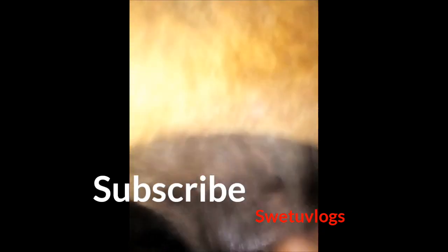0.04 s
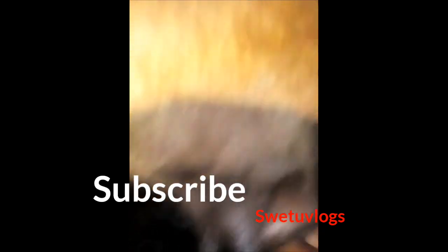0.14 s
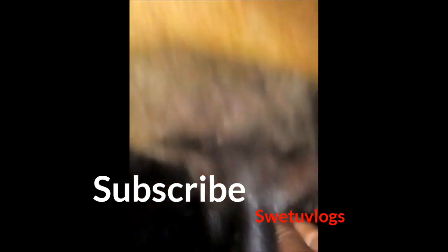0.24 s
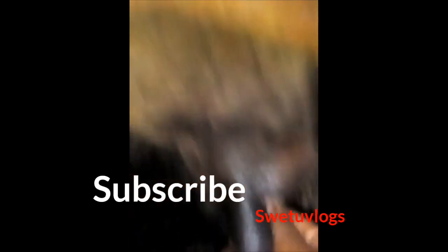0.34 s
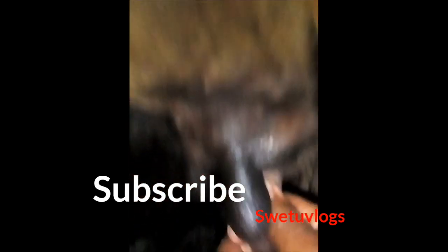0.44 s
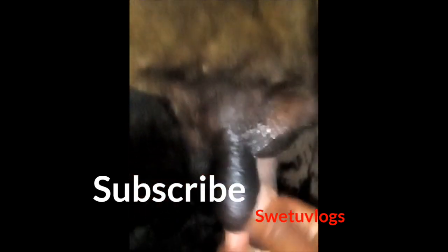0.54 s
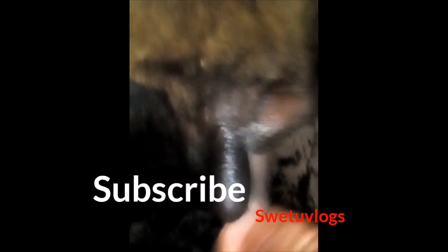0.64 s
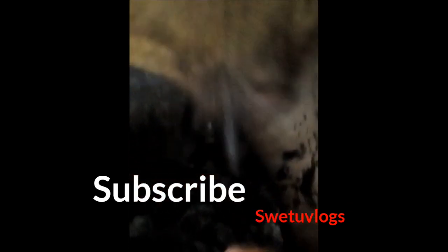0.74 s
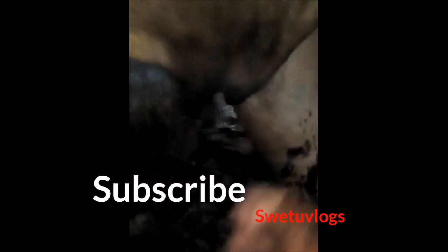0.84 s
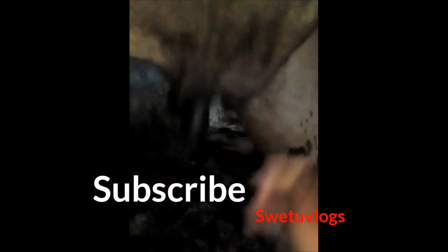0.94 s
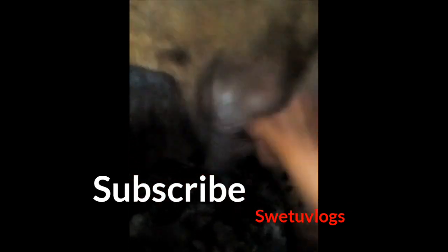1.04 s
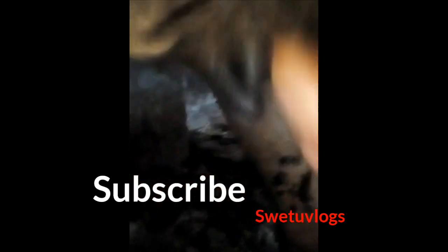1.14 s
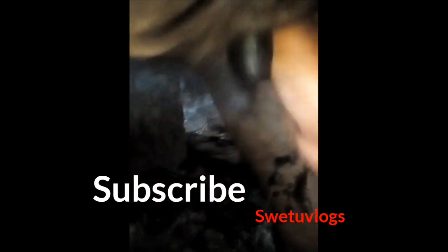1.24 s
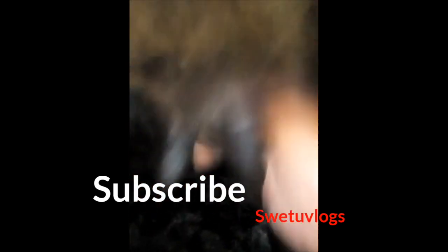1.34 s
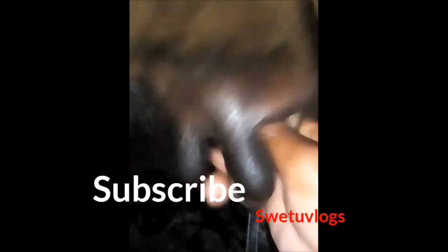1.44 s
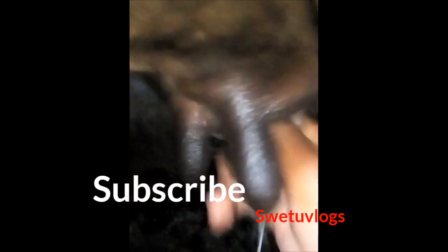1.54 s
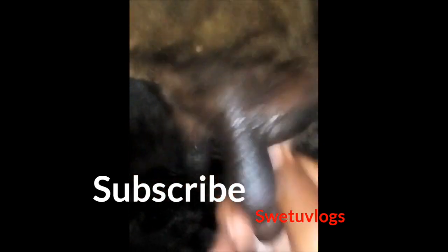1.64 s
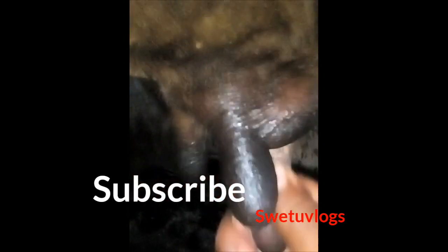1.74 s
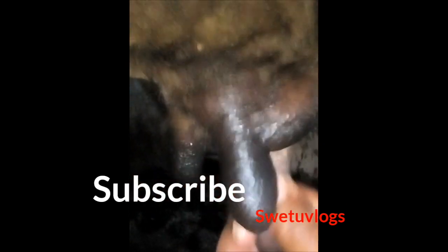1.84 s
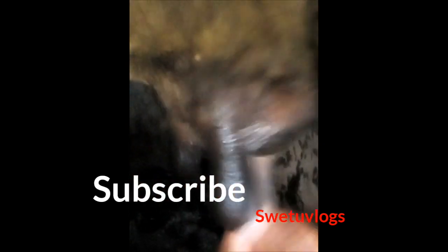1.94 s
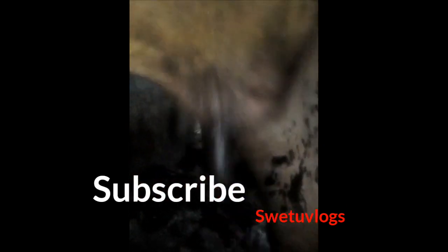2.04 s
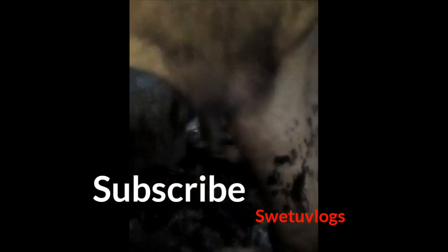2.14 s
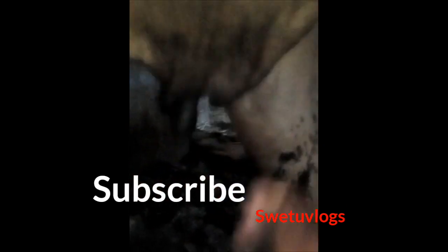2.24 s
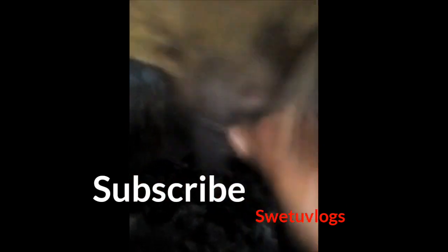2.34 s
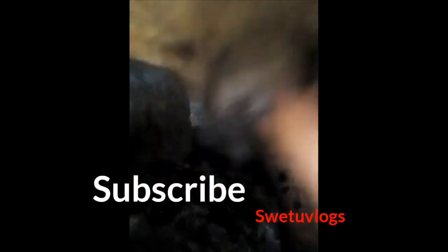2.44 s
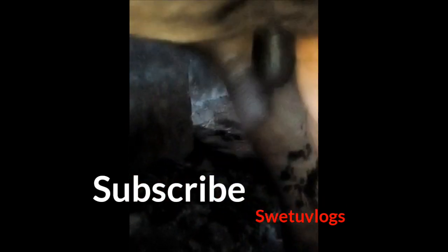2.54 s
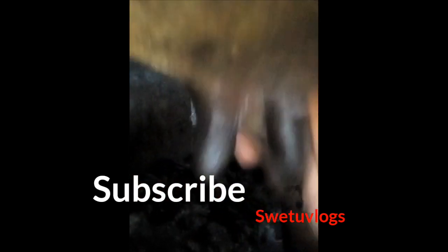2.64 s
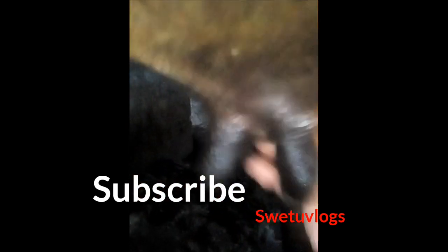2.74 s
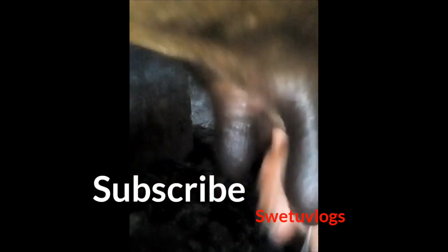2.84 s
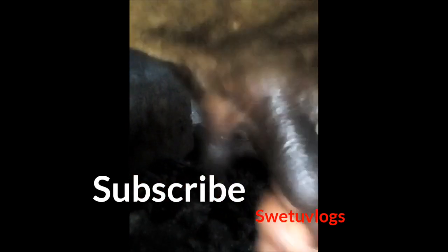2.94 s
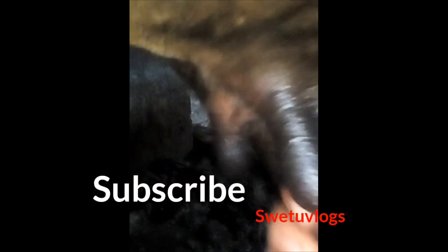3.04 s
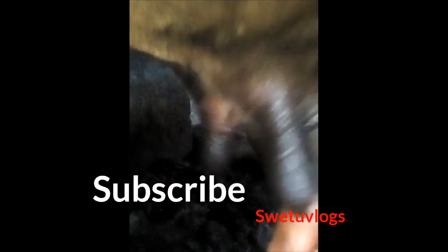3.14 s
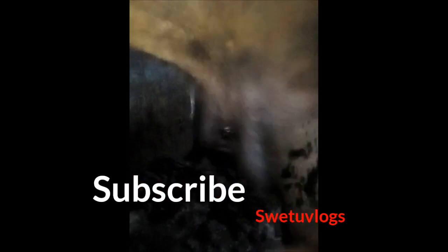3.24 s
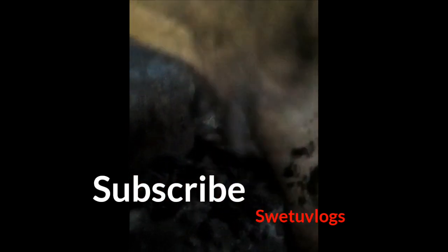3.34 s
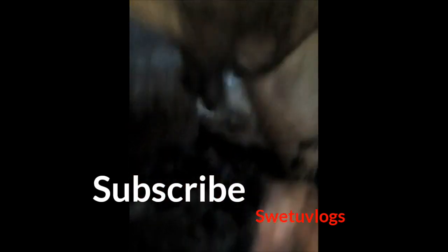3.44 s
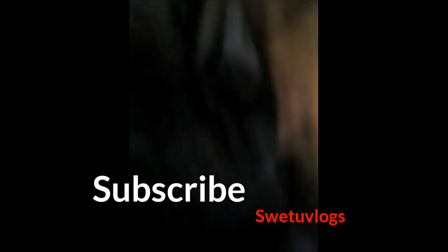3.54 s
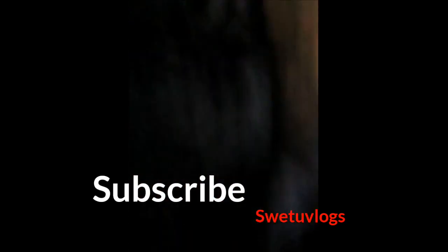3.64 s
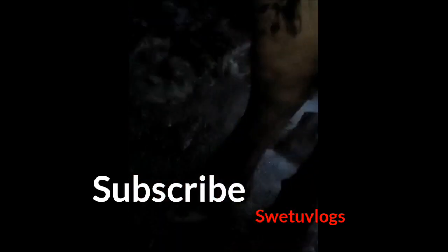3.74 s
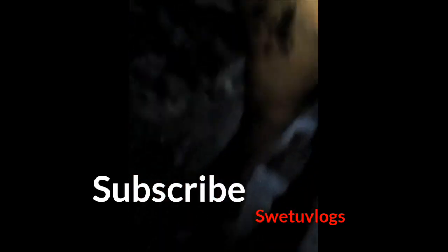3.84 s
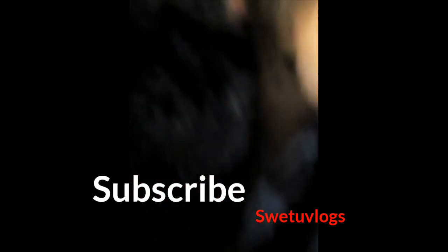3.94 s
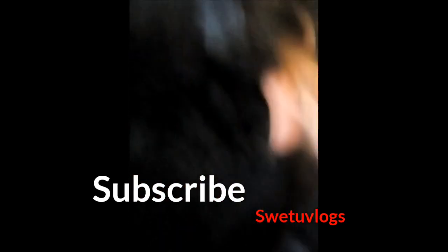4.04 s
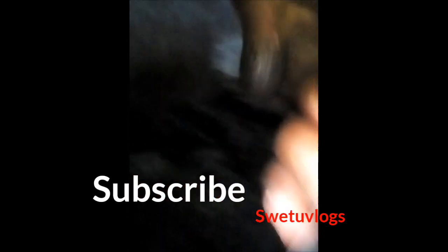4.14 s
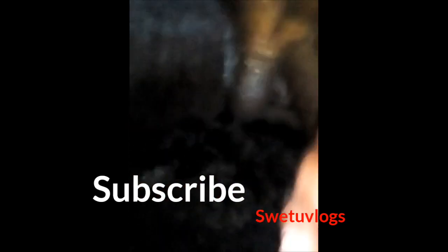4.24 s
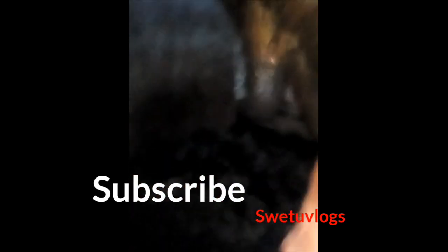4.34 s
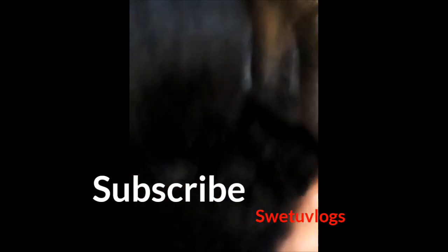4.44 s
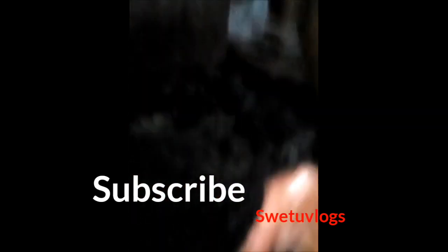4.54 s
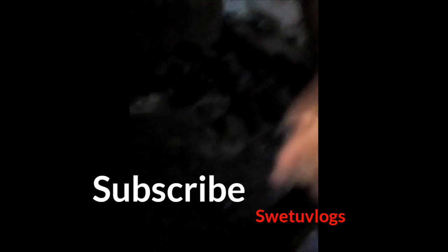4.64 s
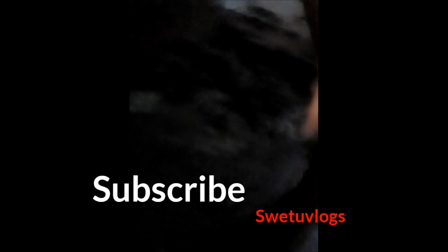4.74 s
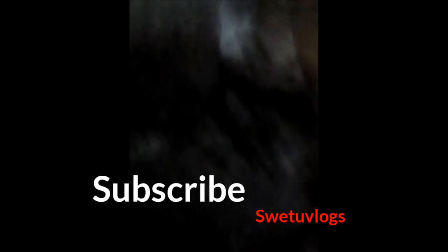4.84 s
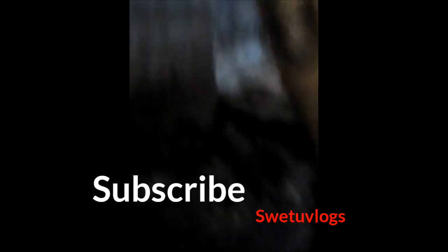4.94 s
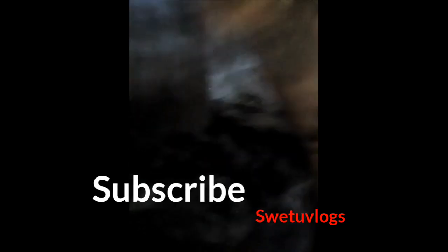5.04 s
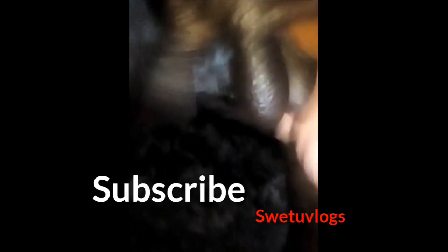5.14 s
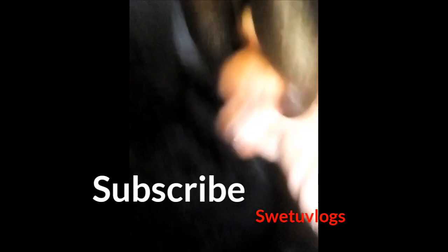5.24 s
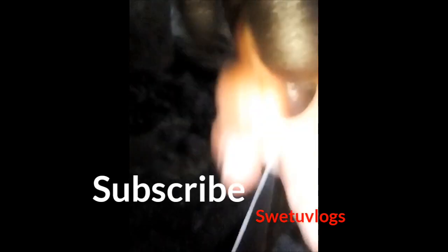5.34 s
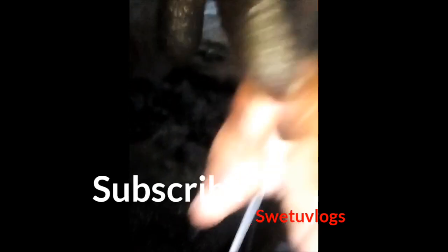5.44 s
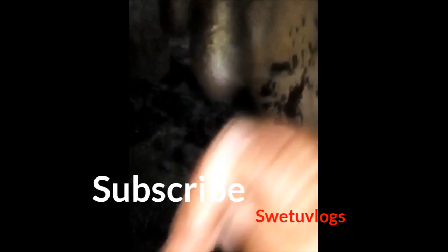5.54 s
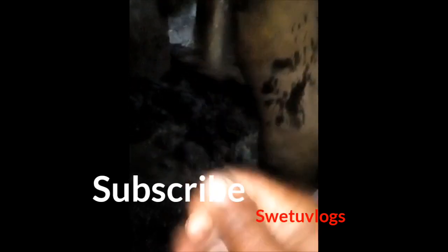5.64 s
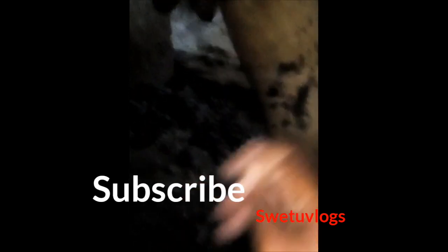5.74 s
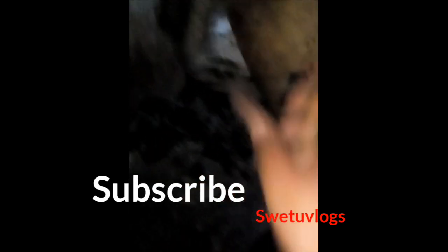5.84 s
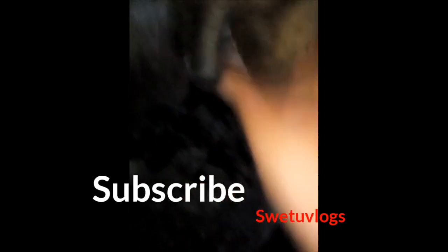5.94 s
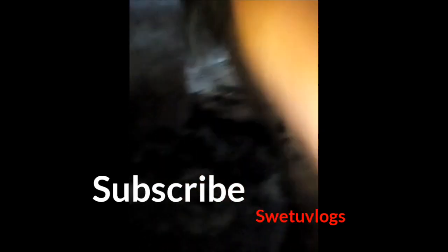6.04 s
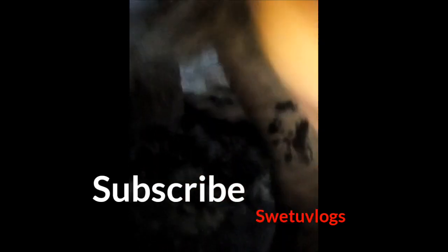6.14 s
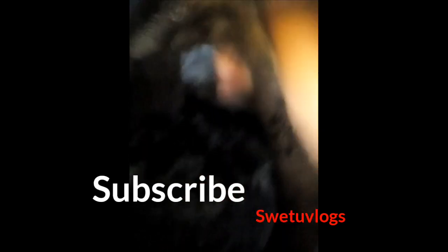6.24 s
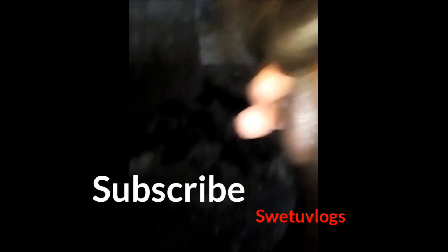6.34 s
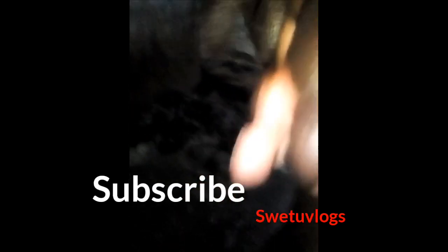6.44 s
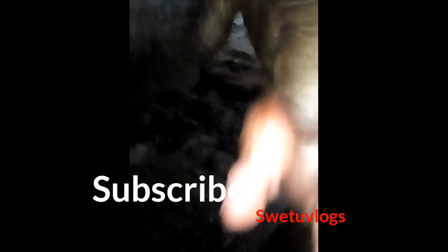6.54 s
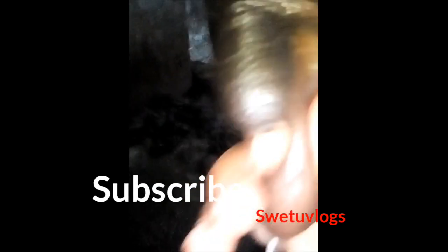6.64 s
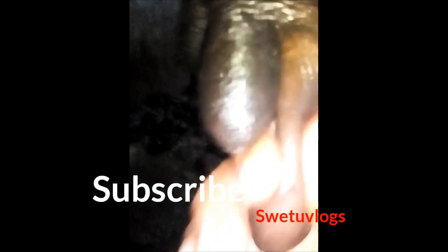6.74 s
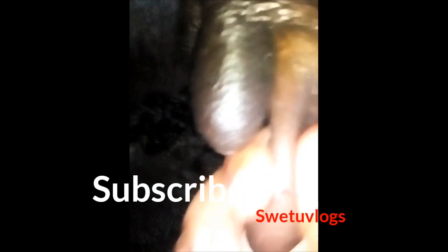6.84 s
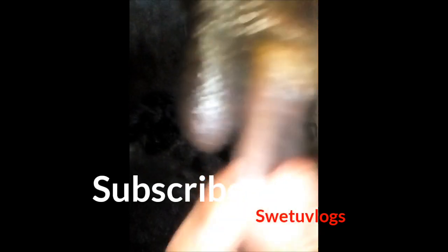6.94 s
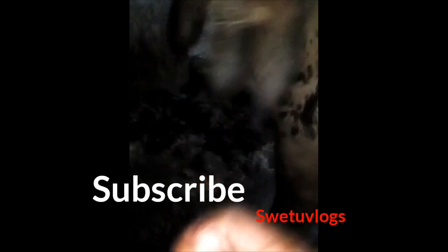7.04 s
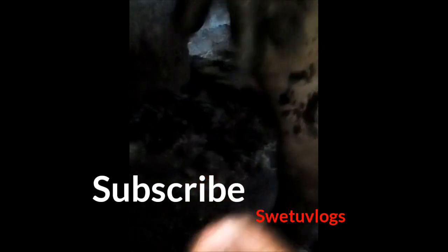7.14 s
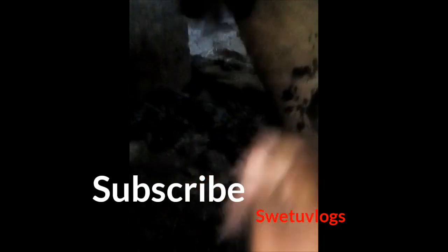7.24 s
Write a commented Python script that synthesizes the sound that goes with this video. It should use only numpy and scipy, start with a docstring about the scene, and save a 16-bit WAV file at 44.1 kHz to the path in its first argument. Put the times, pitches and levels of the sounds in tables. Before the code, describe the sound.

Six short, forceful milk jets squirt rhythmically into a ringing metal pail, while sparrows chirp and far roosters crow over a low farm rumble.

```python
"""Birds whistle and pipe over the low rumble of a farm; then milk is squirted by hand into a metal pail.
Each jet breaks into drops that hiss, ring the pail wall and drive bubbles into the froth: filtered noise
and clicks, resonances and short rising sines, all led by the force of the jet.
Sparrows chirp and far roosters crow as gliding, roughened tones; two dry taps sound close by.
The yard smears the calls with echoes, and the microphone adds its own hiss."""
import sys
import numpy as np
from scipy import signal
from scipy.io import wavfile
from scipy.ndimage import uniform_filter1d

SR = 44100
rng = np.random.default_rng(int(sys.argv[2]) if len(sys.argv) > 2 else 0)


def store_pcm(level_fs):
    """Save levels as 16-bit WAV."""
    pcm = np.round(np.clip(level_fs, -1, 1) * 32767).astype(np.int16)
    wavfile.write(sys.argv[1], SR, np.atleast_2d(pcm).T)


N = 321930  # length of the scene [samples]

# Colour of the low farm rumble: (frequency [Hz], relative level [dB per Hz])
RUMBLE_COLOUR = [(12, -58), (20, -36.5), (53, -41.5), (65, -12), (103, -4.5), (145, -17.5), (201, -2),
                 (236, -10), (304, -15), (700, -43), (910, -53), (1540, -120)]
RUMBLE_DB = -42.5  # rms, before the bass cut
# Colour of the far chatter: (frequency [Hz], relative level [dB per Hz])
CHATTER_COLOUR = [(350, -46), (600, -5.5), (749, -3.5), (1180, -10), (1920, -3.5), (2220, -0.5),
                  (3170, 0.5), (5050, -7.5), (5890, -1.5), (8500, -32), (11000, -64.5), (18700, -120)]
# Swell of the far poultry and birds: (time [s], level [dB])
CHATTER_SWELL = [(0, -57), (.3, -53.5), (.85, -51), (1.3, -52), (2.152, -48), (2.699, -53), (3.5, -54.5),
                 (3.9, -54), (4.601, -54), (5.1, -53.5), (5.801, -55.5), (6.1, -55.5), (6.6, -51.5),
                 (7.3, -46.5)]
# How long the yard's echoes last: (frequency [Hz], time to fall by 60 dB [s])
YARD_DECAY = [(500, 0.61), (2000, 0.24), (5000, 0.32), (9000, 0.066)]
# Syllables of crowing: (start [s], length [s], pitch at the start, at the turn and at the end [Hz],
# share of the length before the turn [0-1], fade by the end [dB], roughness [0-1],
# relative levels of overtones 1 to 4 [dB])
CROW_SYLLABLES = [(.92, 0.28, 688, 728, 738, 0.27, -10, 0.19, -59.5, -84, -57.5, -64),
                  (1.22, .17, 771, 803, 789, 0.61, 1.5, 0.092, -57.5, -62, -64, -60),
                  (1.41, .27, 869, 884, 920, 0.21, 3, 0.35, -68, -55.5, -57, -83),
                  (2.1, 0.19, 789, 811, 820, 0.19, 12.5, 0.2, -59.5, -64, -62, -76),
                  (2.4, .56, 740.6, 691.4, 600, 0.65, -18.5, 0.087, -51, -59, -57, -79),
                  (5.1, 0.18, 827, 804, 728, 0.26, -1, .4, -62, -59.5, -66, -66),
                  (5.31, 0.19, 760, 730, 751, 0.27, -2, 0.16, -58, -73, -80, -82),
                  (5.62, 0.26, 703, 732.3, 732, 0.235, -13.5, 0.31, -54.5, -40, -58, -78),
                  (5.87, .59, 770, 801, 747, .72, -1.5, 0.26, -52, -47, -67, -56),
                  (6.52, 0.21, 746, 774, 760, 0.23, -5, 0.061, -49.5, -50.5, -76, -65),
                  (7.06, 0.16, 727, 731.6, 706.7, 0.31, 4, 0.061, -48, -45, -62, -57)]
# One sparrow chirp, a list of notes: (time from its start [s], pitch before the factor [Hz], relative level [dB])
CHIRP_NOTES = [
    [(0, 5870, -29), (.005, 5950, -11.5), (.012, 5110, -15), (.022, 5600, -8)],
    [(.016, 2780, -24.5), (.027, 4257, -4), (.034, 5007, -0.5), (.05, 3690, -9.5), (.062, 4170, 7)],
    [(.062, 2700, -45), (.075, 3192, -4.5), (.085, 3660, -3.5), (.11, 3187, -23), (.14, 2870, -18)],
]
# When the chirp is repeated: (time [s], relative level [dB], pitch factor [ratio])
CHIRP_TIMES = [(1.011, -25, 0.96), (1.637, -23, 0.95), (2.653, -44, 0.92), (3.506, -22.5, 0.98),
               (3.758, -40.5, 0.85), (4.691, -27.5, 0.94), (5.135, -46, 0.82), (5.772, -46.5, 0.94),
               (6.412, -26.5, 0.95), (7.191, -26.5, 0.93)]
# A rising whistle with a turn: (time from its start [s], pitch before the factor [Hz], relative level [dB])
WHISTLE_NOTES = [
    [(0, 3070, -12), (.024, 4330, -11), (.04, 5710, -7), (.058, 5760, 8)],
    [(.056, 5440, -5), (.08, 3920, -6.5)],
    [(.085, 5450, -12.5), (.108, 6020, 3)],
    [(.105, 4200, -63), (.122, 4880, -1), (.14, 5010, -5.5)],
]
# When the whistle is repeated: (time [s], relative level [dB], pitch factor [ratio])
WHISTLE_TIMES = [(0.029, -25.5, 0.97), (2.824, -28, 1), (5.555, -32, 0.96)]
# Mellow notes of other birds, and one high partial of a crow (at 6.508 s):
# (start [s], length [s], first pitch [Hz], last pitch [Hz], relative level [dB])
MELLOW_NOTES = [(0, 0.053, 2573, 2710, -25), (0, 0.11, 2327, 2547, -34), (.07, 0.036, 2780, 2750, -28),
                (0.269, 0.042, 2173, 2065, -32.5), (.305, .027, 2010, 1750, -33),
                (.333, 0.019, 1857, 1840, -40.5), (0.898, 0.16, 4030, 4460, -51),
                (1.229, 0.086, 3460, 3710, -45.5), (1.402, 0.063, 3410, 3220, -49.5),
                (2.349, .05, 2416, 2270, -39), (2.423, 0.12, 3720, 3680, -55),
                (2.714, 0.16, 2575, 2396, -47.5), (2.846, 0.14, 2734, 2490, -40),
                (2.849, 0.083, 2396, 2226, -29.5), (2.937, 0.056, 2183, 2190, -30.5),
                (3.328, 0.035, 1625, 1660, -31), (3.402, 0.022, 2230, 2230, -23.5),
                (3.862, 0.16, 3090, 2900, -53.5), (4.02, .16, 3729, 3714, -58.5),
                (4.158, 0.048, 3270, 3260, -51.5), (4.754, 0.31, 1800, 1645, -62),
                (4.893, 0.05, 4000, 3750, -47.5), (5.22, 0.048, 2235, 2156, -48),
                (6.281, 0.16, 4700, 4260, -58), (6.508, 0.15, 1920, 1927, -53),
                (6.603, 0.046, 3920, 4190, -51), (6.652, 0.071, 4140, 4060, -54),
                (7.075, 0.066, 2110, 2306, -31.5)]
# Dry taps close by: (time [s], peak of the tick [dB], thud over the tick [dB])
KNOCK_TIMES = [(1.174, -29.5, 14), (3.639, -16.5, 10)]
# Large single drops on the pail: (time [s], peak level [dB], pitch [Hz])
LARGE_DROPS = [(0.414, -29, 1740), (0.581, -11.5, 1930), (0.618, -1, 1370), (0.636, -2, 1110),
               (0.721, -28.5, 4900), (1.79, -5.5, 2500), (1.964, -5, 1450), (2.003, -6.5, 1360),
               (2.038, -12, 1430), (3.018, -25, 2160), (3.098, -29, 1340), (3.293, -20.5, 4570),
               (4.275, -30, 1030), (4.3673, -7, 5800), (4.375, -14, 2640), (4.384, -6, 1790),
               (4.441, -7, 1440), (5.48, -24, 1000), (5.59, -15, 1360), (6.73, -21, 1800),
               (6.875, -6, 2520), (6.902, -3.5, 1450), (6.92, -9, 1500), (6.94, -3.5, 1400),
               (6.956, -11, 3200), (6.993, -1.5, 1930), (7.006, -11, 1260), (7.022, -19, 1330),
               (7.109, -19, 2250)]
# Colour of the drops' hiss: (frequency [Hz], relative level [dB per Hz])
HISS_COLOUR = [(1650, -36.5), (2800, 4), (3130, -8), (3400, 1), (3680, 5), (5370, -2.5), (6640, 3),
               (8500, -28), (11000, -64), (18700, -120)]
# Colour of the finest droplets: (frequency [Hz], relative level [dB per Hz])
SPRAY_COLOUR = [(4410, -54.5), (7500, 4.5), (8610, -9.5), (9800, -7.5), (11400, -16), (13500, -18),
                (15100, -7), (15900, -44)]
# Ways the pail wall can ring: (frequency [Hz], width [Hz], relative level [dB])
PAIL_MODES = [(235.5, 24, 3.5), (395, 45, -1), (500.8, 23.3, -5), (573, 35, -2.5), (792.6, 58, -1.5),
              (1023, 35, -0.5), (1169, 40, -3.5), (1307, 48, -6.5), (1426, 48, -3.5), (1570, 170, -21),
              (1749.5, 23.6, 8.5), (1910, 64, 4.5), (2178, 71, 0), (2216, 53, -0.5), (2322, 92, -4.5),
              (2453, 173, 0), (2604, 57, 3), (2703, 40, -7), (2920, 280, 2.5), (3166, 90, 5),
              (3650, 85, -18), (4360, 84, -13.5), (5016, 140, -0.5), (5760, 140, -7), (6700, 43, -8.5)]
# One entry a squirt, in two parts. Tones: (pitch of the struck spot's ring [Hz], of the bubbles [Hz],
# of the boom [Hz], boom over the force [dB], spray [dB]).
# Pull of the hand: (time [s], jet force [dB], wall ring over the force [dB], froth over the force [dB])
SQUIRT_PULLS = [ ((2700, 1295, 496, -6.5, -41), [(.408, -27, -25.5, -13), (.43, -27, 10, 7),
                (.474, -19, 6.5, -4), (.495, -29, 3.5, -1.5), (.567, -17.5, 4.5, -7.5),
                (.619, -20, -4, 8.5), (.677, -22.5, 1.5, -3), (.719, -38, -1.5, 3), (.785, -57, 6.5, -10),
                (.9, -59.5, 17.5, -1)]), ((2606, 1317, 361.5, -7, -40.5), [(1.69, -29.5, -10, -5),
                (1.712, -32.5, 1, 4.5), (1.717, -20.5, 8, -11), (1.74, -24, 14, 1), (1.788, -17, 3, -9),
                (1.802, -21, -2, -1.5), (1.914, -19.5, -1, 5), (2.026, -23, 5.5, 2.5), (2.04, -36, 5.5, 10),
                (2.14, -57, 0, -15)]), ((1902, 1150, 596, 2, -64), [(2.212, -32, -6, 5), (2.22, -29, 0, 0),
                (2.268, -35, -1, -4), (2.326, -53.5, 3, 4), (2.36, -44.5, 3, 6), (2.47, -55.5, 2.5, -9)]),
                ((2396, 1325, 471, -5, -38), [(3.016, -21, -17, -12), (3.022, -24.5, -12, -8),
                (3.027, -20.5, -12, -4.5), (3.033, -34.5, -4, 7), (3.038, -22, 13, -1),
                (3.095, -19.5, 7, 1.5), (3.149, -19, 2, 9), (3.255, -21.5, 3.5, 2), (3.305, -45, 4, -10),
                (3.36, -50.5, 14, 3)]), ((2604.5, 1110, 414, -14.5, -36), [(4.271, -32, -22, -12),
                (4.286, -30.5, -20, -4), (4.292, -31, 17, 12.5), (4.305, -28, 9, 2.5),
                (4.354, -23, 3, -1.5), (4.422, -19, -8, 10.5), (4.48, -42, -5, -17), (4.55, -55, 5, -3)]),
                ((2796, 1294, 275, 1.5, -36), [(5.476, -29.5, -19, -8), (5.49, -26.5, -3.5, 6),
                (5.525, -28.5, 12, 14.5), (5.553, -25, 13.5, 4.5), (5.572, -31.5, 10.5, 9),
                (5.596, -35, 6.5, 2), (5.66, -55, 4, 15)]), ((2782, 1330, 439, -1.5, -37),
                [(6.718, -36, -14, -21), (6.728, -28, -8, -6), (6.766, -35, 2, 15), (6.774, -19.5, 1.5, -2),
                (6.828, -24, 5.5, 9), (6.872, -26, 5.5, 7.5), (6.936, -26.5, 6, 16), (6.988, -23, 7, 6),
                (7.04, -26.5, 4.5, 10), (7.16, -63.5, 16, 13)]), ((3200, 901, 424, 13.5, -75),
                [(7.24, -52, -16, -20), (7.264, -44.5, -4, 9), (7.3, -45, 0, 6)]), ]
# Colour of the microphone's own hiss: (frequency [Hz], relative level [dB per Hz])
MIC_COLOUR = [(4710, -33.5), (8000, -8.5), (10500, -4), (11800, -5.5), (13600, -8), (15000, -3),
              (15900, -1.5)]
MIC_DB = -76.5

SPOT_SAG = 0.17  # the ring falls by this share as the jet slides down the wall
BOOM_PER_RING = -0.84  # the pail booms less while the jet is on the wall (dB per dB)
BOOM_START_DB, BOOM_RISE_S = -9, 0.11  # the boom builds up as the jet digs into the milk
SPRAY_KNEE_DB, SPRAY_PER_FORCE = -28, 1.7  # steady above this force, dies fast under it (dB per dB)
MELLOW_ATTACK_S, MELLOW_START_DB, MELLOW_FADE_DB = .012, 0.5, -4.5
CROW_ATTACK, CROW_START_DB = 0.13, -3  # share of the syllable; level under the top
CROW_WAVER_DB, CROW_WAVER_S = 2.5, 0.045  # at full roughness; hoarse syllables waver more
LOW_CUT_HZ, EDGE_HZ = 65, 15800  # the microphone loses the deepest bass; upper band limit
OVERLOAD_TOP = .85  # level that soft overload never passes


def gain_of(db):
    """Turns decibels into a factor."""
    return 10 ** (np.asarray(db) / 20)


def evened(x):
    """Scales a sound to rms 1."""
    return x / np.sqrt(np.mean(x ** 2) + 1e-20)


def read(points, hz):
    """Looks up (frequency, value) points on a log frequency axis."""
    f, value = np.transpose(points)
    return np.interp(np.log(hz + 1), np.log(f + 1), value)


def add(mix, s, sound):
    """Lays a sound into the mix at s seconds."""
    part = mix[max(round(s * SR), 0):][:len(sound)]
    part += sound[:len(part)]


def columns(rows):
    """Joins curve rows by straight lines, one value a sample; also gives the start time."""
    s, *values = np.transpose(rows)
    t = np.arange(s[0], s[-1], 1 / SR)
    return s[0], [np.interp(t, s, v) for v in values]


def wander(n, seconds):
    """Random drift of rms 1: noise averaged twice over the given time."""
    width = max(int(seconds * SR), 2)
    once = uniform_filter1d(rng.standard_normal(n), width)
    return evened(uniform_filter1d(once, width))


def coloured(x, points):
    """Gives a sound the colour of the points, with a filter that never acts ahead of time."""
    level_db = read(points, abs(np.fft.fftfreq(4096, 1 / SR)))
    log_gain = np.log(gain_of(np.maximum(level_db, -90)))
    taps = np.fft.ifft(np.exp(np.conj(signal.hilbert(log_gain)))).real[:2048]
    return signal.oaconvolve(x, taps / np.linalg.norm(taps))[:len(x)]


def ring(x, hz, width):
    """A fixed resonance applied twice for steep flanks; white noise keeps about its level."""
    r = np.exp(-1.5 * np.pi * width / SR)
    turn = np.exp(2j * np.pi * hz / SR)
    level = 2 * np.sqrt(2) * (1 - r) ** 1.5
    return level * signal.lfilter([1], np.poly([r * turn] * 2), x + 0j).real


def echoes(x, decays, gap_s):
    """Sparse echoes of random sign after a gap, each band dying at its own speed."""
    taps = np.zeros(SR)
    at = np.arange(int(gap_s * SR), SR - 20, 20)
    taps[at + rng.integers(0, 20, len(at))] = rng.choice([-1., 1.], len(at))
    hz, t, z = signal.stft(taps, SR, nperseg=256)
    fade = gain_of(-60 * t / read(decays, hz)[:, None])
    tail = signal.istft(z * fade, SR, nperseg=256)[1]
    return signal.fftconvolve(x, tail / np.linalg.norm(tail))[:N]


def patchy(points, patch_db, streak_db):
    """Coloured noise from random short spectra, its level drifting in wide patches and long narrow streaks."""
    frames, hz = N // 256 + 5, np.fft.rfftfreq(1024, 1 / SR)
    a, b, patches, streaks = rng.standard_normal((frames, 513, 4)).T
    # axis 0 runs over frequency, axis 1 over time
    patches = evened(uniform_filter1d(uniform_filter1d(patches, size=14, axis=0), size=24, axis=1))
    streaks = evened(uniform_filter1d(uniform_filter1d(streaks, size=3, axis=0), size=30, axis=1))
    depth = np.clip(2500 / (hz[:, None] + 1), .8, 1.7)  # the treble is the steadier part
    level_db = read(points, hz)[:, None] + depth * (patch_db * patches + streak_db * streaks)
    z = (a + 1j * b) * gain_of(level_db)
    return evened(signal.istft(z, nperseg=1024, noverlap=768)[1][:N])


def farm():
    """Low rumble at a steady level and a swelling far chatter, both patchy noise."""
    s, db = np.transpose(CHATTER_SWELL)
    swell = gain_of(np.interp(np.arange(N) / SR, s, db))
    chatter = swell * patchy(CHATTER_COLOUR, patch_db=1.5, streak_db=2.6)
    rumble = gain_of(RUMBLE_DB) * patchy(RUMBLE_COLOUR, patch_db=0.58, streak_db=1.1)
    return rumble + chatter


def hoarse(n, rough, seconds):
    """Fast random changes in size and phase that spread a pure tone into a band."""
    chance = wander(n, seconds) + 1j * wander(n, seconds)
    return (1 + rough * chance) / np.sqrt(1 + 2 * rough ** 2)


def roosters():
    """Each syllable stacks four overtones that swell and fade, each wavering by itself."""
    out = np.zeros(N)
    for start, length, first_hz, turn_hz, last_hz, share, fade_db, rough, *levels_db in CROW_SYLLABLES:
        done = np.arange(0, length, 1 / SR) / length
        n = len(done)
        hz = np.interp(done, [0, share, 1], [first_hz, turn_hz, last_hz])
        swell_db = np.interp(done, [0, CROW_ATTACK, 1], [CROW_START_DB, 0, fade_db])
        shaky_hz = hz * (1 + 0.02 * rough * wander(n, 0.0049))
        turn = np.exp(2j * np.pi * np.cumsum(shaky_hz) / SR)
        stack = np.zeros(n, complex)
        for k, db in enumerate(levels_db, start=1):
            waver_db = CROW_WAVER_DB * np.sqrt(rough) * wander(n, CROW_WAVER_S)
            stack += gain_of(db + waver_db) * turn ** k * hoarse(n, 2 * rough / k, 0.0019)
        soft_ends = signal.windows.tukey(n, .15)
        add(out, start, np.sqrt(2) * gain_of(swell_db) * stack.real * soft_ends)
    return out


def note(rows, db=0, factor=1, rough=0, overtone_db=-30):
    """A near sine on a pitch curve, with soft ends and a weak overtone an octave up."""
    s, (hz, level_db) = columns(rows)
    n = len(hz)
    turn = np.exp(2j * np.pi * np.cumsum(hz * factor) / SR)
    pure = turn + gain_of(overtone_db) * turn ** 2
    tone = (pure * hoarse(n, rough, 0.0013)).real
    soft_ends = signal.windows.tukey(n, min(350 / n, 1))
    return s, np.sqrt(2) * gain_of(db + level_db) * tone * soft_ends


def mellow_note(start, length, first_hz, last_hz, db):
    """A mellow tone: the pitch holds for a moment, then glides while the level fades."""
    rows = [(start, first_hz, MELLOW_START_DB),
            (start + MELLOW_ATTACK_S, first_hz, 0),
            (start + length, last_hz, MELLOW_FADE_DB)]
    return note(rows, db, rough=0.18, overtone_db=-31.5)


def birds():
    """Sparrows repeat one harsh chirp, a whistler one phrase; mellow notes vary, one a high partial of a crow."""
    out = np.zeros(N)
    for start, db, factor in CHIRP_TIMES:
        for rows in CHIRP_NOTES:
            varied_db = db + 2.0 * rng.standard_normal()
            s, sound = note(rows, varied_db, factor, rough=.55, overtone_db=-35)
            add(out, start + s, sound)
    for start, db, factor in WHISTLE_TIMES:
        for rows in WHISTLE_NOTES:
            s, sound = note(rows, db, factor, rough=.3, overtone_db=-24)
            add(out, start + s, sound)
    for row in MELLOW_NOTES:
        add(out, *mellow_note(*row))
    return out


def knock(db, thud_db):
    """A dry tap: a broad tick of ringing noise with a very short dull push under it."""
    t = np.arange(1500) / SR
    blow = rng.standard_normal(len(t)) * np.exp(-t / 0.0022)
    tick = ring(ring(blow, 3000, 2100) + .5 * ring(blow, 5500, 1200), 2400, 3900)
    thud = np.sin(2 * np.pi * 220 * t) * np.exp(-t / 0.0005)
    return gain_of(db) * (tick / abs(tick).max() + gain_of(thud_db) * thud)


def clicks(n, per_s, spread_db):
    """Random impacts of drops, most small, a few large."""
    size = gain_of(spread_db * np.minimum(rng.exponential(1, n), 4)) * rng.choice([-1., 1.], n)
    return size * (rng.random(n) < per_s / SR)


def wall(blows, zones):
    """Pail modes set ringing; in each zone (top [Hz], level [dB], pitch [Hz]) those near the pitch are favoured."""
    out = np.zeros(len(blows))
    for hz, width, db in PAIL_MODES:
        zone_db, spot_hz = next((level, spot) for top, level, spot in zones if hz < top)
        favour_db = 14 * np.exp(-(np.log(hz / spot_hz) / 0.12) ** 2)
        strays_db = 4.5 * wander(len(blows), .022)  # the jet strays, so each mode comes and goes
        out += ring(blows * gain_of(db + zone_db + favour_db + strays_db), hz, width)
    return out


def bubbles(hz, per_s=260, cycles=7, rise=0.49):
    """Air dragged under the froth: short sines that rise as they die."""
    out = np.zeros(len(hz))
    draws = rng.random((int(per_s * len(hz) / SR) + 1, 4))
    for place, shift, size, phase in draws:
        f = hz[int(place * len(hz))] * np.exp(0.42 * (shift - .5))
        turns = np.arange(0, 4 * cycles, f / SR)
        shape = (1 - np.exp(-turns / 1.15)) * np.exp(-turns / cycles * 3.24)
        rising = turns * (1 + rise * turns / 30)
        tone = np.sin(2 * np.pi * (rising + phase))
        add(out, place * len(hz) / SR, gain_of(5.3 * size) * shape * tone)
    return evened(out)


def drop(db, hz):
    """One large drop: a short crack of noise and the wall modes near its pitch."""
    blow = rng.standard_normal(4000) * np.exp(-np.arange(4000) / SR / 0.0017)
    sound = gain_of(1.5) * coloured(blow, HISS_COLOUR)
    sound += gain_of(-13.5) * coloured(blow, SPRAY_COLOUR)
    sound += 3 * ring(blow, hz, 0.22 * hz)
    sound += wall(blow, [(700, -20, 500), (SR, -15, hz)])
    return gain_of(db) * sound / abs(sound).max()


def squirt(tones, rows):
    """The broken jet hisses, rings the wall and makes bubbles, all by its force."""
    spot_hz, bubble_hz, boom_hz, boom_db, spray_db = tones
    s, values = columns(rows)
    pull_length = len(values[0])
    values.append(np.linspace(0, 1, pull_length))
    # extra samples let the wall ring out after the pull
    force_db, ring_db, froth_db, done = np.pad(values, ((0, 0), (0, 3000)), "edge")
    n = len(force_db)
    sagging_hz = spot_hz * (1 - SPOT_SAG * done)
    boom_build_db = BOOM_START_DB * np.exp(-np.arange(n) / SR / BOOM_RISE_S)
    boom_db = boom_db + BOOM_PER_RING * ring_db + boom_build_db
    # taking the force out here keeps the spray steady above the knee
    spray_db = spray_db - force_db + SPRAY_PER_FORCE * np.minimum(force_db - SPRAY_KNEE_DB, 0)

    sputter_db = 1.84 * wander(n, 0.002) + 0.36 * wander(n, 0.0012)
    force = gain_of(force_db + sputter_db) * (np.arange(n) < pull_length)
    blows = force * evened(evened(clicks(n, 900, 3.26)) + 0.89 * rng.standard_normal(n))
    mist = force * evened(0.68 * evened(clicks(n, 2700, 4.0)) + rng.standard_normal(n))

    froth = gain_of(froth_db - 9.5) * force * bubbles(np.full(n, bubble_hz))
    small_bubbles = gain_of(ring_db - 6) * force * bubbles(sagging_hz, per_s=450, cycles=4.5)
    hiss = gain_of(-2.0) * coloured(blows, HISS_COLOUR)
    spray = coloured(gain_of(spray_db) * mist, SPRAY_COLOUR)
    zones = [(700, boom_db - 14.5, boom_hz),
             (1700, froth_db - 16.5, bubble_hz),
             (3400, ring_db - 23.5, sagging_hz),
             (SR, -14, 4300)]
    return s, hiss + spray + froth + small_bubbles + wall(blows, zones)


def scene():
    """Mixes milk and taps, near and almost dry, with far wet calls and the farm; the birds are dulled."""
    milk = np.zeros(N)
    for tones, rows in SQUIRT_PULLS:
        add(milk, *squirt(tones, rows))
    for s, *blow in LARGE_DROPS:
        add(milk, s, drop(*blow))
    for s, *blow in KNOCK_TIMES:
        add(milk, s, knock(*blow))
    near = milk + gain_of(-26.0) * echoes(milk, YARD_DECAY, 0.011)
    dulling = signal.butter(4, 7800, fs=SR, output="sos")
    song = signal.sosfilt(dulling, birds())
    crowing = roosters()
    direct_calls = gain_of(-3) * song + gain_of(0.5) * crowing
    calls_to_yard = gain_of(-3.5) * song + gain_of(-1) * crowing
    return (near + direct_calls + echoes(calls_to_yard, YARD_DECAY, .004) + farm())[None]


def record(dry):
    """The microphone: bass cut, soft overload, its own hiss and the upper band limit."""
    bass_cut = signal.butter(2, LOW_CUT_HZ, "high", fs=SR, output="sos")
    thinned = signal.sosfilt(bass_cut, dry)
    own_hiss = gain_of(MIC_DB) * coloured(rng.standard_normal(N), MIC_COLOUR)
    heard = OVERLOAD_TOP * np.tanh(thinned / OVERLOAD_TOP) + own_hiss
    band_limit = signal.firwin(1023, EDGE_HZ, window=("kaiser", 11), fs=SR)
    return signal.oaconvolve(heard, band_limit[None], "same")


dry = scene()
out = record(dry)
store_pcm(out)
```